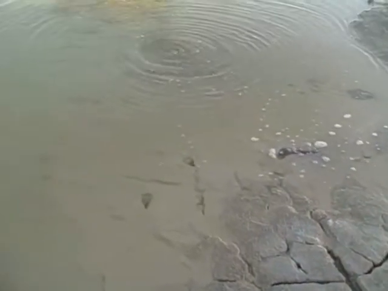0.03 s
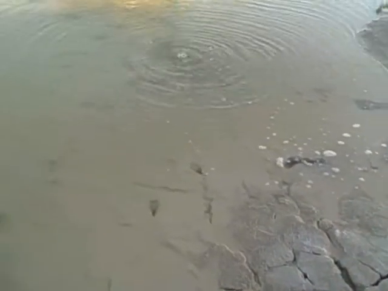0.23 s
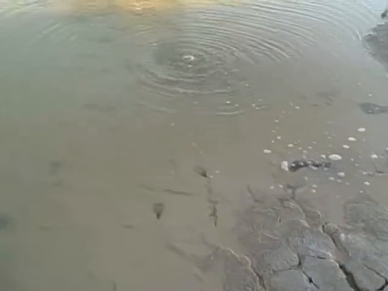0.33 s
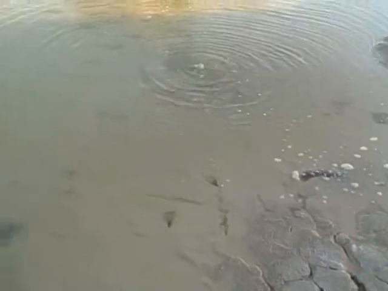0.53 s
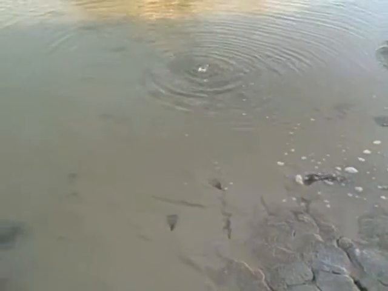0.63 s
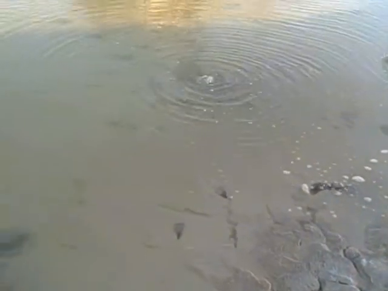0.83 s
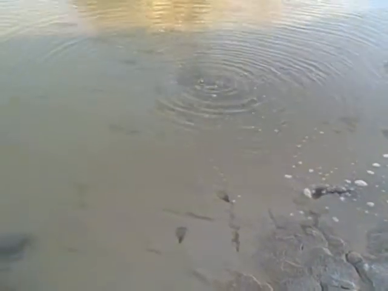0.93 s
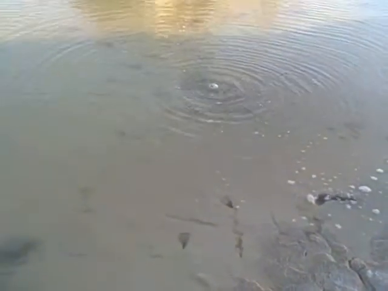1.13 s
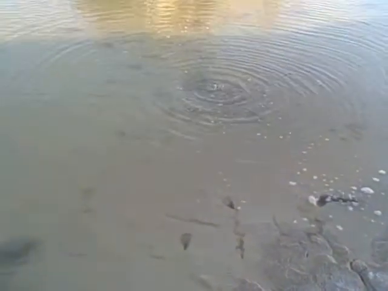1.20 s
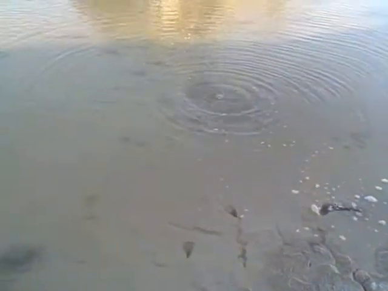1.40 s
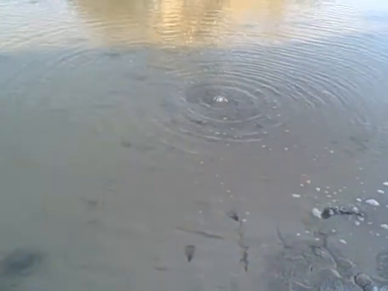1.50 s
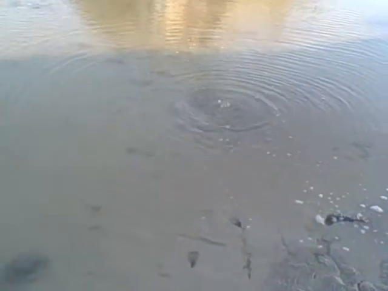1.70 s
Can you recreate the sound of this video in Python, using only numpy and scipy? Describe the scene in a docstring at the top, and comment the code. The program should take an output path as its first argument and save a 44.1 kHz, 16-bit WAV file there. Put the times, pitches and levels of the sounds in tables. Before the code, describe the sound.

Irregular bubbling and gurgling in a shallow mud pool, over a low wind rumble.

```python
"""Small plips and pops come from a shallow muddy pool, and gas wells up in two gurgling bursts.
Each bubble rings as a spring of gas loaded by water, most rising in pitch; large pockets gulp low.
Skins pop over resonant cavities, droplets spatter back, and foam fizzes up at the end.
Wind buffets the microphone over a faint outdoor hiss."""
import sys
import numpy as np
from scipy import signal
from scipy.fft import rfft, irfft
from scipy.io import wavfile
from scipy.ndimage import uniform_filter1d

SR = 44100
rng = np.random.default_rng(int(sys.argv[2]) if len(sys.argv) > 2 else 0)


def pcm_store(signal):
    """Save signal as 16-bit PCM."""
    levels = np.round(np.clip(np.atleast_2d(signal), -1, 1) * 32767)
    wavfile.write(sys.argv[1], SR, levels.astype(np.int16).T)


N = 77175


# Each row: start and length in seconds, level in dB, starting pitch in Hz, rise in octaves,
# roughness from 0 to 1.
RINGING_BUBBLES = [(0.002, 0.017, -64, 610, -0.13, 0), (0.106, 0.021, -57.5, 686, 0.18, 0.33),
                   (0.337, 0.038, -54, 678, 0.87, 0.55), (0.355, 0.021, -51, 1187, 0.71, 0.22),
                   (0.375, 0.022, -54, 409, 1.68, 0.35), (0.381, 0.026, -58, 2590, 0.71, 0.88),
                   (0.384, .012, -53.5, 1366, 0.34, 0.5), (0.446, 0.016, -56, 2904, 0.18, 0.3),
                   (0.4475, .009, -37.5, 1080, -1.1, .35), (0.464, .012, -47.5, 1227, .2, .4),
                   (0.473, 0.025, -57, 1570, 0.02, 0.06), (0.487, .012, -53, 3290, 0.028, 0.56),
                   (0.487, 0.04, -58, 2268, .01, 0), (0.498, 0.018, -54, 876, .15, 0.5),
                   (0.559, 0.041, -54, 828, 0.5, 0.6), (0.592, .031, -48, 790, .95, .42),
                   (0.595, .013, -52, 560, .3, .3), (0.784, 0.025, -58.5, 735, 0.077, 0.7),
                   (0.872, .044, -53, 425, .85, .08), (1.237, .036, -58.5, 600, .6, .3),
                   (1.565, 0.0077, -55, 934, -0.36, 0.42), (1.577, 0.021, -47.5, 1070, 0.21, 0.3),
                   (1.578, 0.023, -49, 569, 0.17, 0.3), (1.579, 0.032, -53.5, 1547, 0.02, 0.14),
                   (1.581, 0.019, -56, 2070, 0.013, .5), (1.585, 0.043, -55, 2700, 0.28, 0.83),
                   (1.612, 0.02, -45, 1119, 0.43, 0.8), (1.614, 0.011, -47.5, 2930, .15, 0.6),
                   (1.612, 0.021, -56, 6080, -0.067, 0.6), (1.619, 0.021, -46.5, 3450, 0.03, 0.88),
                   (1.654, .015, -57, 1880, .15, 0.7), (1.697, 0.0093, -54, 1110, .15, 0),
                   (1.724, 0.016, -52, 714, .1, 0.65)]
def bubble(length, db, hz, rise, rough):
    """Bubble resonance: trapped gas rings at a gliding pitch, and churning mud roughens the tone."""
    progress = np.arange(0, length, 1 / SR) / length
    wobble_octaves = .035 * np.interp(progress, np.linspace(0, 1, 8), rng.standard_normal(8))
    cycles = np.cumsum(hz * 2 ** (rise * progress + wobble_octaves)) / SR
    width_hz = 260 + .033 * hz
    lowpass = 1 / (1 + (np.fft.rfftfreq(8192, 1 / SR) / width_hz) ** 4)
    churn = unit(irfft(rfft(rng.standard_normal((2, 8192))) * lowpass))[:, :len(progress)]
    modulation = np.sqrt(1 - rough ** 2) + rough * (churn[0] + 1j * churn[1]) / np.sqrt(2)
    ring = modulation * np.exp(2j * np.pi * cycles)
    return amp(db) * arch(progress, swell=.33, fade=1.2) * ring.imag


# Each row: start in seconds, level in dB, cavity pitch in Hz, decay time in seconds.
BURSTING_SKINS = [(0.049, -50.5, 1760, 0.0016), (0.063, -52.5, 1200, 0.0017), (0.0915, -45.5, 1300, .0035),
                  (0.274, -52, 1300, .005), (0.4115, -43.5, 1190, 0.0057), (0.4495, -45, 957, 0.008),
                  (0.469, -50, 907, 0.0085), (0.487, -45, 760, .004), (0.568, -57.5, 1233, 0.0035),
                  (1.085, -51.5, 700, .004), (1.392, -51.5, 950, .003), (1.481, -51.5, 1050, .003),
                  (1.6073, -36.5, 1260, 0.0069), (1.615, -35, 1260, .003), (1.653, -39, 1415, 0.0056)]
def pop(db, hz, decay):
    """Cavity resonance: a skin tears with a dull wet crack and the open hollow rings briefly."""
    t = np.arange(4096) / SR
    f = np.fft.rfftfreq(4096, 1 / SR) + 1
    band = 1 / (1 + (.35 * hz / f) ** 2) / (1 + (f / (1.7 * hz)) ** 5)
    crack = unit(irfft(rfft(rng.standard_normal(len(t))) * band))
    ring = np.sin(2 * np.pi * hz * t)
    attack = np.sin(np.pi / 2 * np.minimum(t / .0006, 1)) ** 2
    return amp(db) * attack * np.exp(-t / decay) * (.5 * crack + .45 * ring)


# Each row: start and length in seconds, level in dB, middle pitch in Hz, spread in octaves.
DROPLET_SHOWERS = [(-0.04, 0.18, -66, 1108, 0.62), (0.342, .11, -61, 1090, 0.733),
                   (0.428, 0.067, -71.5, 5600, 0.42), (0.456, 0.075, -60, 1670, 0.76),
                   (0.559, 0.033, -68.5, 2330, 0.11), (1.138, 0.081, -71.5, 2600, 0.58),
                   (1.259, .045, -67, 1380, 0.52), (1.545, 0.065, -67, 1383, 0.56),
                   (1.596, 0.049, -68, 6370, 0.19), (1.606, 0.034, -58, 2485, 0.58),
                   (1.63, 0.066, -59, 1430, 0.48)]
def spatter(length, db, hz, spread, drops_per_s=2300):
    """Air entrainment: each droplet rings a tiny bubble, the higher ones for more cycles."""
    out = np.zeros(round(length * SR))
    for onset, pitch, faintness in rng.random((800, 3))[:int(drops_per_s * length)]:
        drop_hz = min(hz * 2 ** (spread * np.sqrt(3) * (2 * pitch - 1)), SR / 4)
        cycle_count = 7 * np.sqrt(drop_hz / 1000)
        cycles = np.arange(0, cycle_count, drop_hz / SR)
        progress = cycles / cycle_count
        drop = arch(progress, swell=.25, fade=2) * np.sin(2 * np.pi * cycles * (1 + .08 * progress))
        add(out, onset * length, amp(-3.5 * np.log(faintness + .013)) * drop)
    return amp(db) * unit(out * arch(np.linspace(0, 1, len(out)), swell=.33, fade=.74))


# Each row: start and length in seconds, level in dB, pitch in Hz.
GAS_POCKETS = [(0.148, 0.034, -46.5, 209), (0.344, .04, -27, 61.5), (0.405, 0.031, -22.5, 78.7),
               (0.414, 0.0097, -45.5, 311), (0.452, 0.0095, -34.5, 297), (0.448, 0.025, -34, 138),
               (0.5, .022, -28.5, 103), (1.15, 0.06, -37.5, 59.4), (1.219, 0.021, -40, 84)]
def gulp(length, db, hz):
    """Resonant frequency falls with size: a large pocket heaves the water for a few slow cycles."""
    return bubble(length, db, hz, rise=.05, rough=.059)


# Each row: frequency in Hz, relative spectral level in dB.
FOAM_SPECTRUM = [(300, 4.5), (1000, 2.5), (2500, -2), (4200, -0.5), (5000, -6), (5700, 0.5), (7200, -23)]
def fizz(start_s=1.611, rise_s=.11):
    """Incoherent summation: foam is heard as one band of noise, swelling at the end."""
    swell = np.clip((np.arange(N) / SR - start_s) / rise_s, 0, 1)
    return amp(-57) * swell * noise(FOAM_SPECTRUM)


def simmer(bubbles_per_s=60, lowest_hz=381, octaves=3.3, ring_cycles=11.1):
    """Constant-Q resonance: faint random bubbles ring equally many cycles, so high ones end sooner."""
    out = np.zeros(N)
    for onset, pitch, faintness in rng.random((400, 3))[:int(bubbles_per_s * N / SR)]:
        hz = lowest_hz * 2 ** (octaves * pitch)
        db = -75 - 2.5 * np.log(faintness + .15)
        add(out, onset * N / SR, bubble(ring_cycles / hz, db, hz, rise=.17, rough=.6))
    return out


def banks(water, t60_s=.14):
    """Diffuse reflection: the muddy banks return a short, exponentially decaying tail."""
    t = np.arange(SR // 2) / SR
    tail = rng.standard_normal(len(t)) * amp(-60 * t / t60_s) * (t > .003)
    return amp(-12.5) * signal.fftconvolve(water, tail / np.linalg.norm(tail))[:N]


# Each row: time in seconds, relative levels of the rumble and of the flutter in dB.
GUSTS = [(0.02, -52, -59), (0.178, -61.5, -57.5), (0.212, -54, -71), (0.24, -36, -63), (0.322, -39.5, -56),
         (0.346, -33.5, -48.5), (0.468, -31.5, -42.5), (0.53, -37, -49.5), (0.558, -32, -46),
         (0.592, -33, -55.5), (0.708, -42.5, -56.5), (0.738, -43, -64), (0.844, -36.5, -58),
         (0.862, -43.5, -60), (1.074, -48, -60), (1.166, -40.5, -61), (1.204, -59, -61),
         (1.228, -37.5, -51), (1.282, -49, -63), (1.334, -44.5, -64.5), (1.392, -51, -62), (1.43, -43, -58),
         (1.634, -52.5, -60.5), (1.676, -56.5, -58.5), (1.72, -45, -58.5), (1.75, -47.5, -69)]
# Each row of both spectra: frequency in Hz, relative spectral level in dB.
RUMBLE_SPECTRUM = [(10, -35), (22, 7.5), (35, 1), (60, -1.5), (90, -10), (130, -23), (250, -35.5),
                   (600, -105)]
FLUTTER_SPECTRUM = [(50, -6.5), (100, -11.5), (140, 1.5), (220, -12), (320, -18), (600, -24), (2000, -54.5)]
def wind():
    """Turbulent pressure: eddies buffet the microphone with a rumble and a low flutter."""
    times, rumble_db, flutter_db = np.transpose(GUSTS)
    out = np.zeros(N)
    for spectrum, db in ((RUMBLE_SPECTRUM, rumble_db - 1), (FLUTTER_SPECTRUM, flutter_db + .5)):
        eddies = noise(spectrum)
        # Even out the noise over 45 ms so that the gusts set its level.
        eddies /= np.sqrt(uniform_filter1d(eddies ** 2, int(.045 * SR)) + 1e-9)
        out += eddies * amp(np.interp(np.arange(N) / SR, times, db))
    return out


# Each row: frequency in Hz, relative spectral level in dB.
AIR_SPECTRUM = [(60, -19.5), (250, 2.5), (400, -4.5), (600, -2.5), (850, -5.5), (1200, -9), (1900, -9),
                (2700, -14.5), (3800, -14.5), (4700, -21), (5600, -19), (7300, -24)]
def air(patch_db=2.5):
    """Random amplitude modulation: a faint outdoor hiss wavers in patches of time and frequency."""
    spectrogram = signal.stft(noise(AIR_SPECTRUM), nperseg=512)[2]
    patches = uniform_filter1d(rng.standard_normal(spectrogram.shape), size=7, axis=0)
    patches = unit(uniform_filter1d(patches, size=5, axis=1))
    hiss = signal.istft(spectrogram * amp(patch_db * patches), nperseg=512)[1][:N]
    return amp(-67) * unit(hiss)


def noise(spectrum):
    """Spectral shaping: white noise takes on the given spectrum, at unit RMS."""
    hz, db = np.transpose(spectrum)
    gain = amp(np.interp(np.log(np.fft.rfftfreq(N, 1 / SR) + 1), np.log(hz), db))
    return unit(irfft(rfft(rng.standard_normal(N)) * gain, N))


def arch(progress, swell, fade):
    """Amplitude envelope: a sine rise until progress reaches swell, then a power-law fall."""
    attack = np.sin(np.pi / 2 * np.minimum(progress / swell, 1))
    return attack * np.clip((1 - progress) / (1 - swell), 0, 1) ** fade


def amp(db):
    return 10 ** (np.asarray(db) / 20)


def unit(x):
    return x / np.sqrt(np.mean(x ** 2) + 1e-20)


def add(mix, start_s, sound):
    at = round(start_s * SR)
    sound = sound[max(-at, 0):]
    part = mix[max(at, 0):][:len(sound)]
    part += sound[:len(part)]


def play(source, table):
    out = np.zeros(N)
    for start_s, *row in table:
        add(out, start_s, source(*row))
    return out


def scene():
    """Superposition: the pool, its reflections, the wind and the air sum to one channel."""
    water = play(bubble, RINGING_BUBBLES) + play(pop, BURSTING_SKINS)
    water += play(spatter, DROPLET_SHOWERS) + fizz() + simmer()
    return (water + banks(water) + play(gulp, GAS_POCKETS) + wind() + air())[None]


def record(dry, cutoff_hz=7450):
    """Band limiting: a steep low-pass filter removes the top treble."""
    lowpass = signal.firwin(401, cutoff_hz, window=("kaiser", 8), fs=SR)
    return signal.oaconvolve(dry, lowpass[None], "same")


dry = scene()
out = record(dry)
pcm_store(out)
```